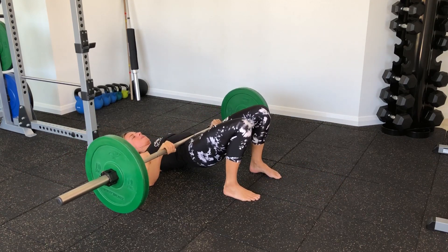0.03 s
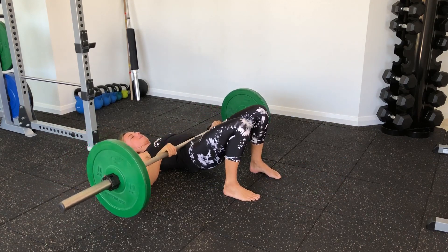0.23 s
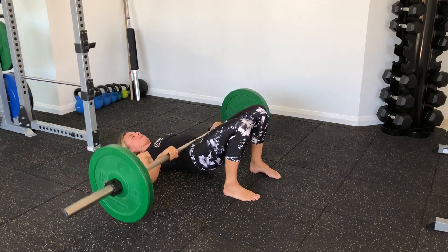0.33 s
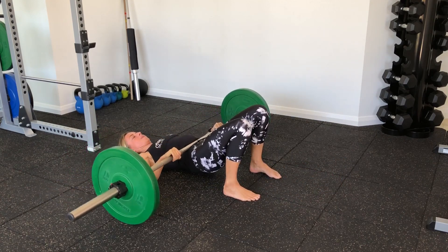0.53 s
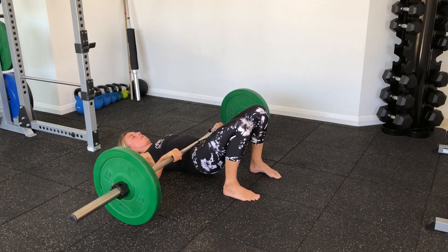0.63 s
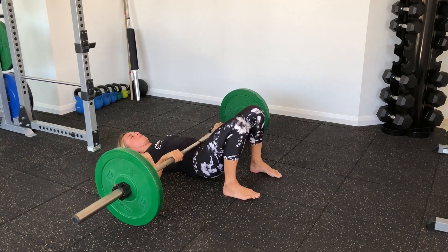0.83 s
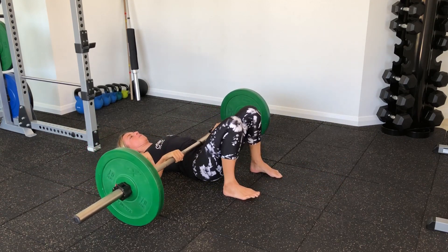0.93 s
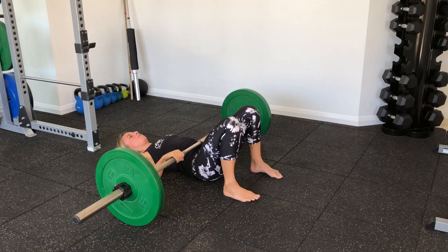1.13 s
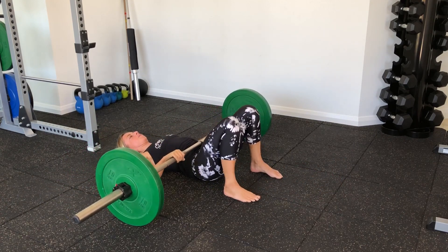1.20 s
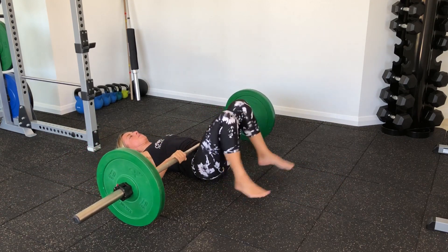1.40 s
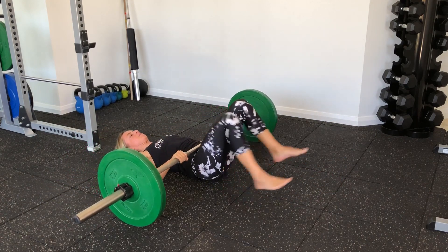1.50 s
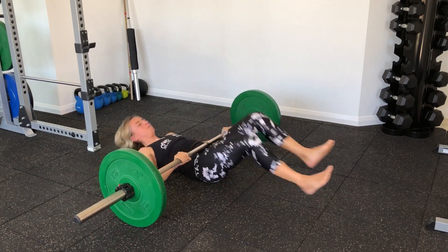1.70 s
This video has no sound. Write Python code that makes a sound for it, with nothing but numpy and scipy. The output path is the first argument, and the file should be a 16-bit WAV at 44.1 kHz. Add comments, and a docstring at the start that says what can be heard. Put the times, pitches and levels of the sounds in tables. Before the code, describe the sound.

Heavy barbell set down on rubber matting, knocking, clacking hard and settling in an echoing room.

```python
"""A loaded barbell is set down on the rubber floor of a bare-walled gym.
One bumper plate touches first with a dull knock; the other lands hard, its steel hub clacks on the
sleeve, and the bar bumps and settles. The room rings on over a low rumble of air, then bare feet
brush the mat."""
import sys
import numpy as np
from scipy import signal
from scipy.fft import rfft, irfft
from scipy.io import wavfile

SR = 44100
rng = np.random.default_rng(int(sys.argv[2]) if len(sys.argv) > 2 else 0)


def to_wav(s):
    """Save 16-bit WAV."""
    ch = np.atleast_2d(s).T  # columns
    pcm = np.round(np.clip(ch, -1, 1) * 32767)  # PCM
    wavfile.write(sys.argv[1], SR, pcm.astype(np.int16))


N = 77175


def amp(db):
    """dB to gain."""
    return 10 ** (np.asarray(db) / 20)


def unit(x):
    """Scale to energy 1."""
    return x / np.sqrt(np.sum(x ** 2) + 1e-20)


def read(points, hz):
    """Interpolate a table over log frequency."""
    points_hz, values = np.transpose(points)
    return np.interp(np.log(hz + 1), np.log(points_hz + 1), values)


def add(mix, start_s, sound):
    """Mix a sound in at start_s."""
    part = mix[round(start_s * SR):][:len(sound)]
    part += sound[:len(part)]


def noise(colour, size=N):
    """Noise of a given spectrum, rms 1."""
    hz = np.fft.rfftfreq(size, 1 / SR)
    spectrum = rfft(rng.standard_normal(size)) * amp(read(colour, hz))
    return np.sqrt(size) * unit(irfft(spectrum, size))


def air(level_db=-65.5):
    """Room air: steady low rumble, thin hiss."""
    # air spectrum: (frequency [Hz], relative density [dB])
    rumble = [(20, -34.5), (36, 1), (55, -9), (110, -1.5), (250, -7.5), (500, -14), (1000, -20.5),
              (2000, -27), (4000, -29.5), (8000, -32), (15500, -40.5)]
    return amp(level_db) * noise(rumble)


def click(colour, tilt_db_per_oct, travel_1khz_s=0.000938, size=4096):
    """Contact pulse, spread into a falling chirp: low bending waves travel the bar more slowly."""
    hz = np.fft.fftfreq(size, 1 / SR)
    gain_db = read(colour, abs(hz)) + tilt_db_per_oct * np.log2(1 + abs(hz) / 1000)
    log_spectrum = np.conj(signal.hilbert(np.log(amp(gain_db))))  # minimum phase
    bend_rad = 4 * np.pi * travel_1khz_s * np.sign(hz) * np.sqrt(1000 * abs(hz))
    pulse = np.fft.ifft(np.exp(log_spectrum - 1j * bend_rad)).real
    return unit(pulse[:size // 2])


def ring(modes, rise_s=0.0091):
    """Decaying modes of a struck body."""
    t = np.arange(SR) / SR
    sines = np.zeros(SR)
    for hz, db, t60_s in modes:
        decay = np.exp(-np.log(1000) * t / t60_s)
        sines += amp(db) * decay * np.sin(2 * np.pi * hz * t)
    return unit(sines * (1 - np.exp(-t / rise_s)))


def sleeve_clacks():
    """Hub strikes sleeve: a quick chatter of snaps rings the steel and fills the room."""
    # hub strikes: (time [s], level [dB], tilt [dB/oct], relative ring [dB])
    clacks = [(0.2307, -26, -7.5, -2.5), (0.2345, -16, -5, -3.5), (0.4769, 2, -0.41, -2),
              (0.6678, -17, -6, -7)]
    # contacts within a clack: (delay [s], relative level [dB], added tilt [dB/oct])
    chatter = [(0, -7, 4.5), (.0009, -1.5, 7), (.0019, -4, -1)]
    # spectrum of one contact: (frequency [Hz], level [dB])
    snap_colour = [(100, -25.5), (900, -9), (1800, -3), (2650, 1), (3700, -2.5), (5000, -14.5), (8000, -23),
                   (12000, -28), (15500, -42)]
    # spectrum the bar throws into the room: (frequency [Hz], level [dB])
    clatter_colour = [(60, -30), (250, -13.5), (600, -5), (1300, -5), (1900, -3), (2650, -5), (3200, -7.5),
                      (3530, 4), (3900, -5), (5200, -9), (6400, -9), (7700, -17.5), (9500, -14.5),
                      (12000, -18), (15500, -27)]
    # bar and sleeve: (frequency [Hz], level [dB], t60 [s])
    steel_modes = [(1470, -0.5, 0.32), (1930, -5, 0.25), (2102, -2.5, .3), (2435, -0.5, .28),
                   (2533, -3.5, .22), (2783, -2.5, 0.37), (2882, -5.5, 0.49), (3510, -1.5, .38),
                   (3570, 1, .3), (3660, 1, .27), (3711, 2, .24), (3880, -5.5, .28), (4640, -7, .25),
                   (7432, -12, .25), (9300, -17, 0.31), (11400, -19.5, .18)]
    steel = ring(steel_modes)
    snaps, clatter, ringing = np.zeros((3, N))
    for start_s, db, tilt, ring_db in clacks:
        for delay_s, contact_db, added_tilt in chatter:
            add(snaps, start_s + delay_s, amp(db + contact_db) * click(snap_colour, tilt + added_tilt))
        add(clatter, start_s, amp(db) * click(clatter_colour, tilt))
        add(ringing, start_s, amp(db + ring_db) * steel)
    return echoes(snaps) + amp(5) * reverb(clatter, build_s=0.001) + ringing


def plate_landings():
    """Rubber knocks on the mat; the plate rings, the floor booms."""
    # floor contacts: (time [s], level [dB], tilt [dB/oct], relative ring [dB], relative boom [dB])
    landings = [(0.2331, -16, -4.3, 8, -32.5), (0.479, -9, .8, 7, -8), (0.520, -15.5, -6, 6, -19.5),
                (0.620, -21.5, -0.5, -7, 2), (0.669, -18, 5.5, -0.5, -10)]
    # dull rubber knock: (frequency [Hz], level [dB])
    knock_colour = [(40, -29), (110, -21.5), (170, -5), (240, 0.5), (340, 1), (450, -7), (700, -4.5),
                    (920, 0.5), (1100, -5), (1300, -5), (1600, -12), (3000, -28.5), (7000, -46),
                    (16000, -71)]
    # bumper plate: (frequency [Hz], level [dB], t60 [s])
    plate_modes = [(185, -10, .5), (221, -3.5, 1), (321.2, -0.5, 0.65), (361, 4, .7), (612, -1.5, .45),
                   (701, -5.5, 0.34), (790, -8.5, .6), (933, -8, 0.95), (963, -8, .8), (1044, -5, 0.94),
                   (1176, -9, 0.22), (1328, 4, .35)]
    # floor under the mats: (frequency [Hz], level [dB], t60 [s])
    slab_modes = [(41.8, -8.5, 1.2), (71, -2, 1.3), (97, -9, 0.78), (148.3, 1.5, 1.0)]
    plate, slab = ring(plate_modes), ring(slab_modes)
    knocks, ringing = np.zeros((2, N))
    for start_s, db, tilt, ring_db, boom_db in landings:
        add(knocks, start_s, amp(db) * click(knock_colour, tilt))
        add(ringing, start_s, amp(db + ring_db) * plate + amp(db + boom_db) * slab)
    return echoes(knocks) + amp(6) * reverb(knocks, build_s=0.0077) + ringing


def feet():
    """Bare feet brush the mat as they lift; each scuff swells and fades."""
    # foot lifts: (time [s], level [dB], swell [s])
    scuffs = [(1.336, -42, 0.026), (1.435, -43.5, 0.01)]
    # skin on rubber: (frequency [Hz], level [dB])
    brush_colour = [(100, -8), (600, -1.5), (2000, -4.5), (5000, -7), (9000, -20), (15500, -21.5)]
    t = np.arange(SR // 4) / SR
    out = np.zeros(N)
    for start_s, db, swell_s in scuffs:
        envelope = t * np.exp(-t / swell_s)
        add(out, start_s, amp(db) * unit(noise(brush_colour, len(t)) * envelope))
    return echoes(out)


def echoes(x):
    """Direct sound plus first reflections."""
    # floor and walls: (delay [s], gain [dB])
    reflections = [(.0043, -10), (.0072, -15), (.0125, -19.5), (.0185, -13), (0.0221, -9.5), (.026, -15.5)]
    out = x.copy()
    for delay_s, db in reflections:
        add(out, delay_s, amp(db) * x)
    return out


def reverb(x, build_s):
    """Diffuse tail of the gym: fills over build_s, bass lasts longest."""
    # room decay: (frequency [Hz], t60 [s])
    room_t60 = [(60, 1.4), (200, 1.46), (450, 1.297), (900, 0.94), (1500, 0.79), (2500, 0.59), (4500, 0.59),
                (8000, 0.47), (12000, 0.36), (16000, 0.4)]
    hz, t, bands = signal.stft(rng.standard_normal(SR), SR, nperseg=512)
    decay = np.exp(-np.log(1000) * t / read(room_t60, hz)[:, None])
    tail = signal.istft(bands * decay, SR)[1][:SR]
    build = 1 - np.exp(-np.arange(SR) / SR / build_s)
    return signal.fftconvolve(x, unit(tail * build))[:N]


def scene():
    """Barbell, feet and room air, mono."""
    return (plate_landings() + sleeve_clacks() + feet() + air())[None]


def record(dry, cutoff_hz=15900):
    """Steep low-pass."""
    lowpass = signal.firwin(511, cutoff_hz, window=("kaiser", 9), fs=SR)
    return signal.oaconvolve(dry, lowpass[None], "same")


dry = scene()
out = record(dry)
to_wav(out)
```